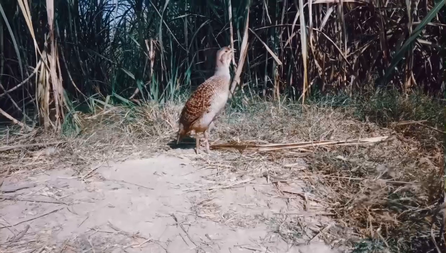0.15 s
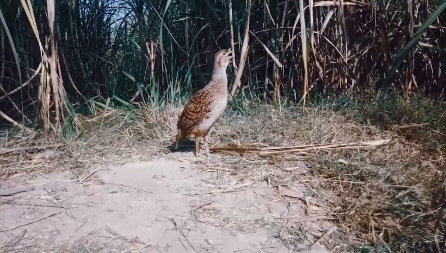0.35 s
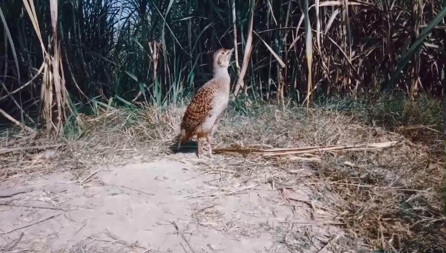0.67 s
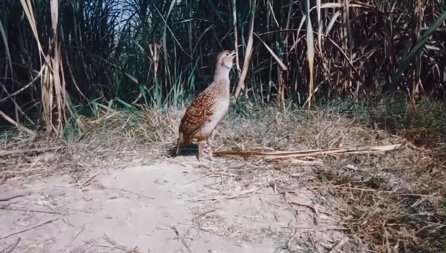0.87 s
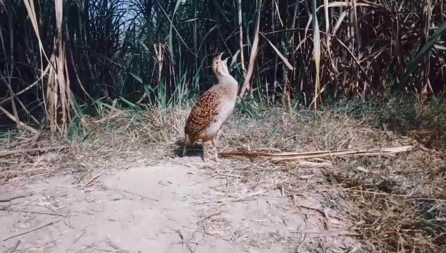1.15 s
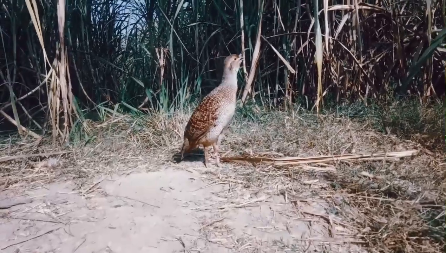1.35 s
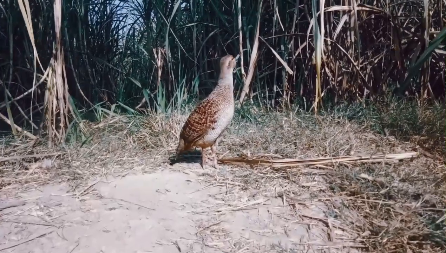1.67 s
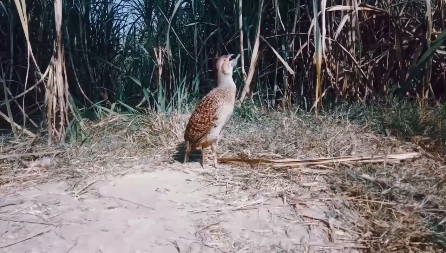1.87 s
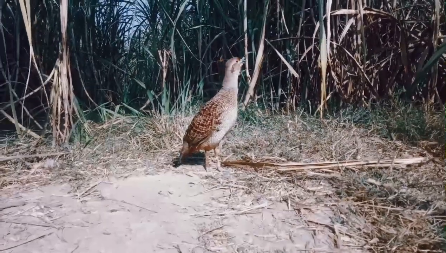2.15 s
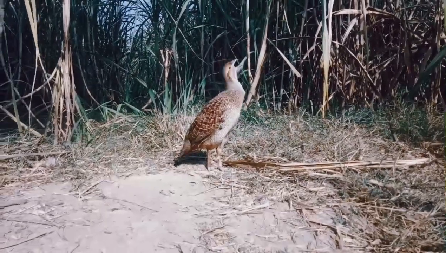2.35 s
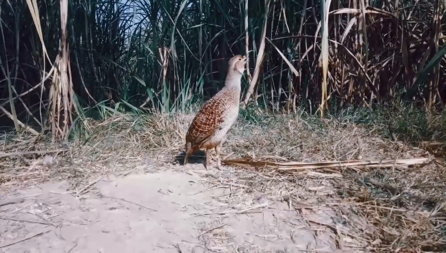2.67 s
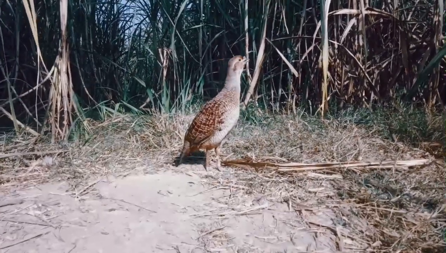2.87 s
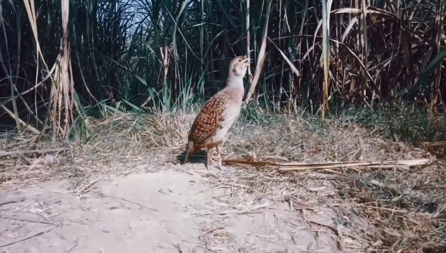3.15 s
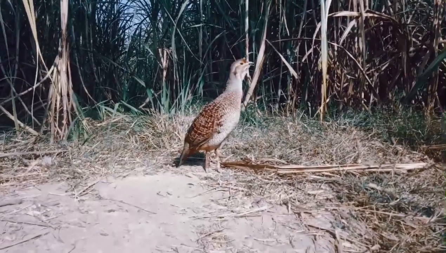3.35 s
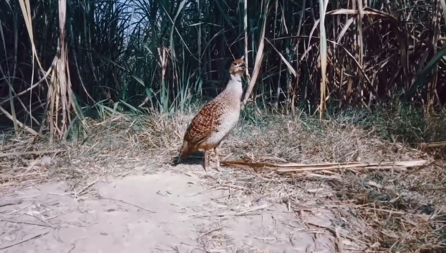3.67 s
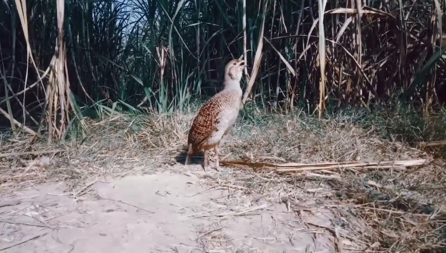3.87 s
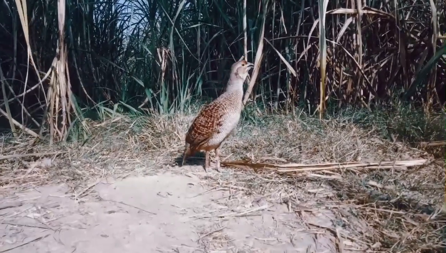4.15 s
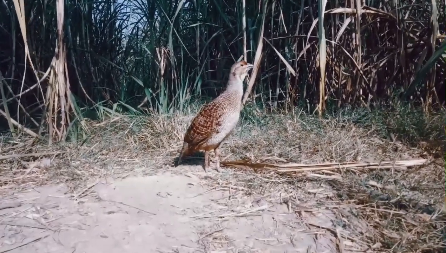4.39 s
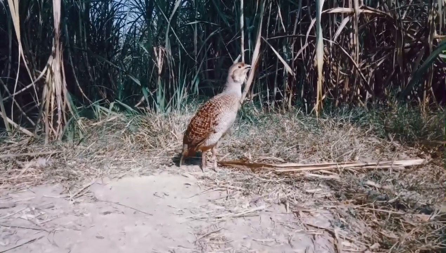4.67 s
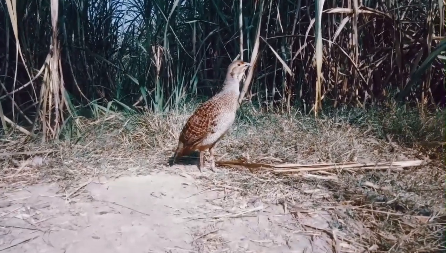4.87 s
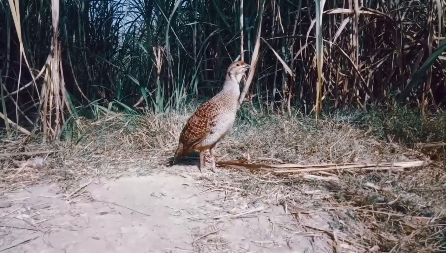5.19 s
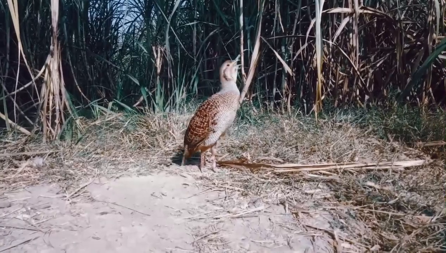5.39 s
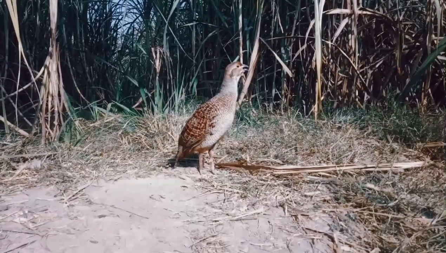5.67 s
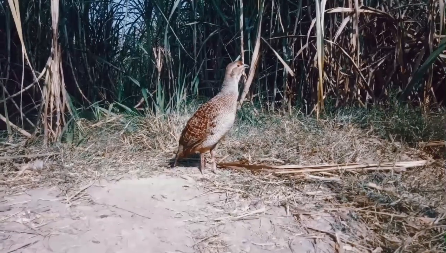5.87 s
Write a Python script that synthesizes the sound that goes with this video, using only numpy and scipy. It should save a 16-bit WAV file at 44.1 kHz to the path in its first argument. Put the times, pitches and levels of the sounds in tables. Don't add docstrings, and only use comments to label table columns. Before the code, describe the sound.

A ground bird close by shrieks a shrill, fast, rasping phrase over and over, with quick paired clucks between, beside reeds, stopping abruptly.

```python
import sys
import numpy as np
from scipy import signal
from scipy.fft import rfft, irfft, next_fast_len
from scipy.io import wavfile
from scipy.ndimage import uniform_filter1d, map_coordinates

SR = 44100
rng = np.random.default_rng(int(sys.argv[2]) if len(sys.argv) > 2 else 0)


def level_to_linear(level):
    exponent = np.asarray(level, float) / 20
    return 10 ** exponent


def unload_audio(sound):
    columns = np.transpose(np.atleast_2d(sound))
    steps = np.round(np.clip(columns, -1, 1) * 32767)
    wavfile.write(sys.argv[1], SR, steps.astype(np.int16))


N = 265923

# start_s, length_ms, pitch_hz, level_db
LONG_NOTES = [
    (.374, 68, 2359, -14.5),
    (.989, 71, 2402, -17.5),
    (1.588, 70, 2340, -14.5),
    (2.22, 74, 2329, -14),
    (2.85, 72, 2328, -14.5),
    (3.594, 67, 2336, -14),
    (4.364, 72, 2340, -15.5),
    (5.143, 71, 2324, -13),
]
# start_s, length_ms, top_hz, level_db
ARCHED_NOTES = [
    (0.536, 22, 2230, -10.5),
    (1.142, 21, 2197, -9.5),
    (1.751, 24, 2178, -10.5),
    (2.367, 24, 2205, -10),
    (2.983, 22, 2170, -8.5),
    (3.73, 21, 2128, -7),
    (4.505, 20, 2168, -7.5),
    (5.272, 17, 2131, -6),
]
# start_s, length_ms, leap_ms (until the high register, 99 for none), level_db
HELD_NOTES = [
    (-.015, 34, 10, -13),
    (.58, 32, 10, -5),
    (1.185, 30, 11, -5.5),
    (1.795, 28, 99, -7.5),
    (2.41, 30, 99, -7),
    (3.026, 29, 99, -6),
    (3.774, 28, 99, -6.5),
    (4.548, 29, 99, -6.5),
    (5.316, 29, 99, -6.5),
]
# start_s, length_ms, leap_ms (until the high register, 99 for none), level_db
SINKING_NOTES = [
    (.024, 64.6, 5, -9),
    (.624, 66.65, 8, -7),
    (1.226, 69, 8, -7),
    (1.838, 68, 8, -9),
    (2.457, 68, 32, -10.5),
    (3.068, 71.83, 99, -10),
    (3.814, 72.2, 99, -10.5),
    (4.589, 69.5, 5, -8.5),
    (5.353, 72, 6, -8.5),
]
# start_s, rasp_ms, swell_ms, pitch_hz, level_db
TIGHT_CLUCKS = [
    (.207, 24.6, 17.3, 2112, -6),
    (0.337, 30.8, 15.6, 1980, -7),
    (.813, 25, 17.2, 2090, -6.5),
    (0.947, 30.8, 16, 1902, -7),
    (1.419, 27, 14.6, 2067, -8),
    (1.551, 32.5, 10.7, 1930, -7),
    (2.03, 26, 16, 2044, -10),
    (2.169, 34, 10.7, 1898, -9.5),
    (2.645, 29.1, 12, 2030, -8.5),
    (3.261, 30.2, 10.5, 1952, -7.5),
]
# start_s, rasp_ms, first_hz, level_db
SLACK_CLUCKS = [
    (2.785, 32, 1950, -9),
    (3.4, 35, 1933, -11.5),
    (4.009, 33, 2057, -9.5),
    (4.151, 31, 1955, -13.5),
    (4.776, 31, 2027, -8),
    (4.913, 33, 1866, -13.5),
    (5.542, 34, 2049, -8),
    (5.685, 33, 1923, -16),
]
# freq_hz, level_db
HALF_SPEED_THROAT = [(700, -29), (1100, -7.5), (2200, -4), (3300, 3.5), (4500, -15), (5400, -29.5),
                     (15000, -52)]
# freq_hz, level_db
AIR_THROAT = [(700, -40.5), (1100, -14), (2200, 10.5), (3350, 11), (4500, -14), (5400, -27.5),
              (8000, -32.5), (15000, -42.5)]

RASP_HZ = 590


def unit(x):
    return x / np.sqrt(np.mean(x ** 2) + 1e-20)


def along(points, hz):
    f, v = np.transpose(points)
    return np.interp(np.log(hz + 1), np.log(f), v)


def wobble(rate):
    coarse = np.arange(0, N + 8, 8)
    knots = rng.standard_normal(int(N * rate / SR) + 4)
    return np.interp(np.arange(N), coarse, map_coordinates(knots, [coarse * rate / SR]))


def filtered(x, response):
    m = next_fast_len(N + 8192)
    return irfft(rfft(x, m) * response(np.fft.rfftfreq(m, 1 / SR)), m)[:N]


def after(row):
    return row[0] + row[1] / 1000


def shaped(shape, s, ms, hz=1, db=0, start=0, stop=1):
    share, pitch, level = np.transpose(shape)
    u = np.unique(np.clip([start, *share, stop], start, min(stop, 1)))
    f = hz * np.interp(u, share, pitch)
    g = db + np.interp(u, share, level)
    return list(zip(s + u[:-1] * ms / 1000, np.diff(u) * ms, f[:-1], f[1:], g[:-1], g[1:]))


def beak(rows, db):
    return [(*row, db) for row in rows]


def played(rows, join, edge=70):
    s, ms, hz0, hz1, db0, db1, *extra = np.transpose(sorted(rows))
    next_s = np.append(s[1:], 9)
    end = np.minimum(s + ms / 1000, next_s - 1e-4)
    t = np.arange(N) / SR
    knots = np.ravel([s, end], "F")
    note = np.clip(np.searchsorted(s, t) - 1, 0, None)
    leaps_up = np.append(hz0[1:], 9) > 1.3 * hz1
    apart = (next_s - end > join) | leaps_up
    silent = (t < s[0]) | (t > end[note]) & apart[note]
    hz = np.interp(t, knots, np.ravel([hz0, hz1], "F"))
    gain = level_to_linear(np.interp(t, knots, np.ravel([db0, db1], "F"))) * ~silent

    def smooth(v):
        return uniform_filter1d(uniform_filter1d(v, int(edge)), int(edge))

    return [smooth(hz), smooth(gain)] + [smooth(e[note]) for e in extra]


def air(throat):
    return unit(filtered(rng.standard_normal(N), lambda f: level_to_linear(along(throat, f)) * (f > 250)))


def whistle(rows, breath_db, upper_db, half_db):
    # freq_hz, level_db
    overtone_colour = [(4800, -1.5), (5700, -11.5), (6900, -8.5), (9200, -26), (11500, -21.5),
                       (14000, -19.5), (15700, -39.5)]
    leap_hz = 2450
    hz, gain, beak_db = played(rows, join=.013)
    phase = 2 * np.pi * np.cumsum(hz * (1 + 0.0025 * wobble(300))) / SR
    octave = level_to_linear(beak_db + along(overtone_colour, 2 * hz) + 0.27 * wobble(180))
    upper = sum(level_to_linear(along(overtone_colour, k * hz) + 3.4 * wobble(300)) * np.sin(k * phase)
                for k in range(3, 8))
    upper *= level_to_linear(0.44 * np.minimum(beak_db, 0) + upper_db) * np.abs(gain) ** 0.32
    tone = (np.sin(phase) + octave * np.sin(2 * phase)) / np.sqrt(1 + octave ** 2) + upper
    halves = sum(level_to_linear(db) * (1 + 0.79 * wobble(200)) * np.sin(k * phase / 2)
                 for k, db in ((1, -19), (3, 4.5), (5, -23.5)))
    tone += np.clip((leap_hz - hz) / 100, 0, 1) * level_to_linear(half_db) / (0.15 + np.abs(gain)) * halves
    return gain * (np.sqrt(2) * tone * level_to_linear(0.25 * wobble(340)) + level_to_linear(breath_db) * air(AIR_THROAT))


def break_gaps():
    break_hz = 1185
    gaps = [(after(r), 1000 * (q[0] - after(r)), break_hz, -15, -15)
            for r, q in zip(ARCHED_NOTES, HELD_NOTES[1:])]
    gaps += [(after(r), 1000 * (q[0] - after(r)), break_hz, -19, -20)
             for r, q in zip(HELD_NOTES, SINKING_NOTES)]
    return gaps


def caller_whistles():
    # length_share, pitch_ratio, level_db
    level_shape = [(0, 1, -2), (.6, .991, 0), (.93, .982, -1), (1, .95, -2)]
    arch_shape = [(0, .85, -9), (.3, .95, -3), (.55, 1, -1), (.8, .97, -1), (1, .88, -3)]
    # length_share, pitch_hz, level_db
    hold_shapes = [
        [(0, 2350, -0.5), (.4, 2308, -2), (.75, 2285, 2), (1, 2086, -6.5)],
        [(.3, 2957, 5.5), (.8, 2840, -2.5)],
    ]
    sink_shapes = [
        [(0, 2386, -1.5), (.12, 2345, 0), (.5, 2093, 3), (.75, 1950, 0.5), (1, 1740, -11.5)],
        [(.1, 2909, 2), (.4, 2812, 0), (.52, 2712, -6.5), (.85, 2505, -16.5), (1, 2150, -11.5)],
    ]
    # length_ms, first_hz, last_hz, first_db, last_db
    plunge = (7, 1100, 400, -46, -48)
    # length_ms, first_hz, last_hz, first_db, last_db
    puff = (12, 690, 650, -58, -61)
    plunge_after_s, puff_after_s, runup_ms = .014, .036, 6

    notes = []
    for s, ms, hz, db in LONG_NOTES:
        notes += beak(shaped(level_shape, s, ms, hz, db), -12)
    for s, ms, hz, db in ARCHED_NOTES:
        notes += beak(shaped(arch_shape, s, ms, hz, db), .5)
    for rows, (low, high), beak_db in (HELD_NOTES, hold_shapes, -16), (SINKING_NOTES, sink_shapes, -18):
        back = high[-1][0]
        for s, ms, leap, db in rows:
            notes += beak(shaped(low, s, ms, db=db, stop=leap / ms), beak_db)
            if leap < ms:
                notes += beak(shaped(high, s, ms, db=db, start=leap / ms, stop=back), -19.5)
                notes += beak(shaped(low, s, ms, db=db - 6, start=min(back, 1)), -9.5)
            notes += beak([(s - runup_ms / 1000, runup_ms, 1850, 2250, db - 17, db - 12.5)], 1)
    notes += beak([(after(r) + plunge_after_s, *plunge) for r in SINKING_NOTES], -31)
    notes += beak([(after(r) + puff_after_s, *puff) for r in SINKING_NOTES], -31)

    slides = []
    for s, ms, f, a, b in break_gaps():
        slides += [(s, 4, 1950, 1700, a - 2.5, a - 1.5), (s + .004, 6, 1700, 1620, a - 1.5, a - 9)]
    slides += [(after(r), 7, 1800, 1690, r[3] - 2, r[3] - 8) for r in LONG_NOTES]
    return whistle(notes + beak(slides, 23), breath_db=-31.0, upper_db=-18.5, half_db=-40.5)


def hoarse(rows, throat, tilt, top, rough_db, hiss_db):
    hz, gain = played(rows, join=.009, edge=80)
    effort = np.clip(np.log10(np.abs(gain) + 1e-9) + 2.1, .05, 1.2)
    phase = 2 * np.pi * np.cumsum(hz * (1 + 0.03038 * effort * wobble(250))) / SR
    levels = [level_to_linear(along(throat, k * hz) + tilt * effort * np.log2(min(k, top))) for k in range(1, 12)]
    stack = 0
    for k, level in enumerate(levels, 1):
        rough = level_to_linear(rough_db * effort * (np.tanh(wobble(160)) - 0.82))
        stack = stack + level * rough * np.sin(k * phase + k * k)
    stack *= np.sqrt(2 / np.sum(np.square(levels), 0))
    hiss = level_to_linear(hiss_db) * effort ** 2 * air(AIR_THROAT) * (1 + 0.11 * np.sin(phase))
    return gain * (stack + hiss)


def caller_breaks():
    # length_share, pitch_ratio, level_db
    tail_shape = [(0, 1.04, -11), (.2, 1, -10), (.5, 1, -11), (.65, 1, -20), (1, .98, -40)]
    tail_ms, tail_hz = 50, 1095
    lead_ms, lead_from_hz, lead_hz = 24, 1100, 1104
    slack = [(s, ms, f - 60, f, a - 5, b - 3) for s, ms, f, a, b in break_gaps()]
    for r in LONG_NOTES:
        slack += shaped(tail_shape, after(r), tail_ms, tail_hz, r[3])
        slack += [(r[0] - lead_ms / 1000, lead_ms, lead_from_hz, lead_hz, -25, -20)]
    return hoarse(slack, HALF_SPEED_THROAT, tilt=4, top=3, rough_db=5, hiss_db=-4)


def fades(ends):
    hz, gain = played([(s, ms, 1.03 * f, .9 * f, a, b) for s, ms, f, a, b in ends], join=0, edge=200)
    return gain * unit((1 + 0.82 * wobble(500)) * np.sin(2 * np.pi * np.cumsum(hz) / SR))


def caller_fades():
    fade_ms, fade_hz = 23, 1715
    return fades([(after(r), fade_ms, fade_hz, -19, -43) for r in SINKING_NOTES])


def rasps(starts):
    # freq_hz, level_db
    rasp_throat = [(300, -8), (1150, -4), (1800, 0), (3000, -12), (4400, -24), (5200, -50), (15000, -58)]
    rows, end, before = [], 0, 0
    for s, ms, hz, a, b in sorted(starts):
        first = before if s - end < .009 else .58 * hz
        knee_hz = first + (.75 if hz > first else .3) * (hz - first)
        knee_db = a + 0.55 * (b - a)
        early = .4 * ms
        rows += [(s, early, first, knee_hz, a, knee_db)]
        rows += [(s + early / 1000, ms - early, knee_hz, hz, knee_db, b)]
        end, before = s + ms / 1000, hz
    return hoarse(rows, rasp_throat, tilt=9, top=6, rough_db=7, hiss_db=-3)


def openings():
    # start_s, length_ms, pulse_rate_hz, first_db, last_db
    grunts = [
        (3.552, 40, 590, -29.5, -19),
        (4.307, 52, 611.8, -39, -22),
        (5.065, 47, 591.2, -50.5, -22),
        (5.107, 33, 549, -19, -32),
        (5.836, 39, 601, -57, -29.5),
        (5.876, 23.6, 446, -33, -36.5),
    ]
    clucks = [(s, ms, RASP_HZ, 0.58 * db - 33, 0.32 * db - 17)
              for s, ms, *_, db in TIGHT_CLUCKS + SLACK_CLUCKS]
    arches = [(s - .01, 11, RASP_HZ, -36, -23) for s, *_ in ARCHED_NOTES]
    return rasps(grunts + clucks + arches)


def mate():
    # length_share, glide_share, level_db
    swell_shape = [(0, -.5, -8.5), (0.599, 0.13, -1.5), (.85, -0.027, 4), (1.002, 0.61, -6.5)]
    # length_share, pitch_ratio, level_db
    tail_shape = [(0, 1.17, -12), (.45, 1.08, -12), (.82, .92, -18), (.9, .75, -34), (1, .3, -46)]
    drop_shape = [(0, 1, -4), (.1, .96, 0), (.3, .89, -2), (.37, .86, -13), (.88, .7, -21), (.92, .55, -30),
                  (1, .25, -44)]
    level_swell_hz, glide_per_hz = 2030, 0.4
    tail_ms, drop_ms, lead_ms = 34, 45, 23
    slack, tight = .46, .54

    notes, lead, ends = [], [], []
    for s, ms, swell_ms, hz, db in TIGHT_CLUCKS:
        on = s + ms / 1000
        glide = [(u, hz + g * glide_per_hz * (hz - level_swell_hz), d) for u, g, d in swell_shape]
        notes += beak(shaped(glide, on, swell_ms, db=db), -14)
        notes += beak(shaped(tail_shape, on + swell_ms / 1000, tail_ms, hz, db), -18)
    for s, ms, hz, db in SLACK_CLUCKS:
        notes += beak(shaped(drop_shape, s + ms / 1000, drop_ms, hz, db), -13)
        ends += [(s + (ms + 0.62 * drop_ms) / 1000, 12, 0.54 * hz, db - 24, db - 39)]
    for s, ms, *_, hz, db in TIGHT_CLUCKS + SLACK_CLUCKS:
        start = s + (ms - lead_ms) / 1000
        lead += [(start, lead_ms, slack * hz, tight * hz, 0.15 * db - 28, 1.2 * db - 18)]
    half = hoarse(lead, HALF_SPEED_THROAT, tilt=3, top=3, rough_db=5, hiss_db=-4)
    return whistle(notes, breath_db=-27.5, upper_db=-27, half_db=-43.5) + half + fades(ends)


def reeds(x):
    # freq_hz, t60_s
    decay = [(500, 0.019), (2000, 0.17), (5000, 0.17)]
    hz, t, z = signal.stft(rng.standard_normal(SR // 2), SR, nperseg=256)
    dying = z * level_to_linear(-60 * t / along(decay, hz)[:, None])
    tail = signal.istft(dying, SR, nperseg=256)[1]
    late = np.pad(x, (300, 0))
    return signal.fftconvolve(late, tail / np.linalg.norm(tail))[:N]


def field():
    # freq_hz, level_db (per Hz)
    quiet_colour = [(18, -22.5), (45, -0.5), (114, 4.5), (292, -1.5), (852, -7.5), (15500, -25)]
    return unit(filtered(rng.standard_normal(N), lambda f: level_to_linear(along(quiet_colour, f))))


def scene():
    voice = caller_whistles() + caller_breaks() + caller_fades() + openings() + mate()
    return (voice + level_to_linear(-15) * reeds(voice))[None]


def top_cut(x):
    return signal.sosfilt(signal.butter(12, 15750, fs=SR, output="sos"), x)


def record(dry):
    low_cut_hz = 150
    swing = uniform_filter1d(np.abs(signal.hilbert(dry, next_fast_len(N))[:, :N]), size=12)
    held = dry / (1 + (swing / .9) ** 6) ** (1 / 6)
    held = filtered(held[0], lambda f: 1j * f / (low_cut_hz + 1j * f))[None]
    hiss_gain = level_to_linear(-71.0 + 1.5 * wobble(0.86)) + level_to_linear(-62.5) * uniform_filter1d(swing, 900)
    return top_cut(held + hiss_gain * field())


dry = scene()
out = record(dry)
unload_audio(out)
```